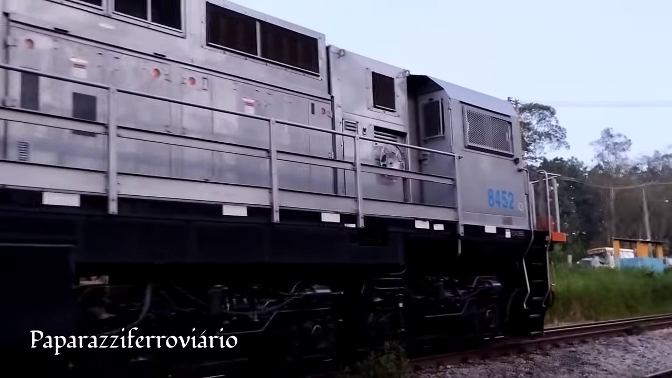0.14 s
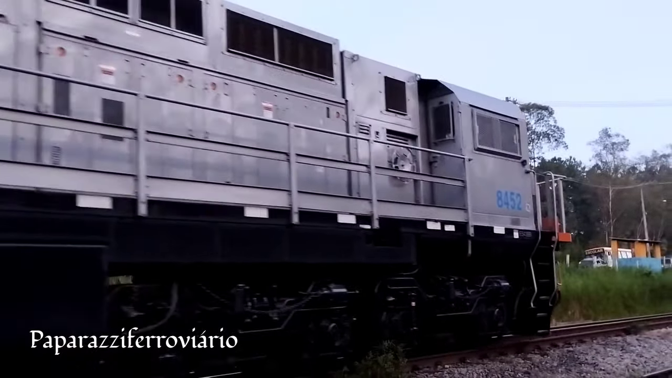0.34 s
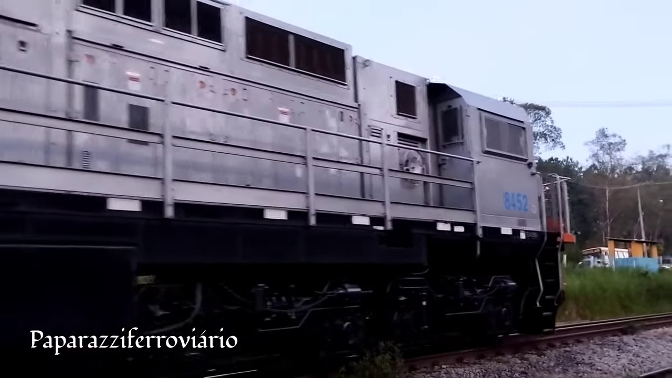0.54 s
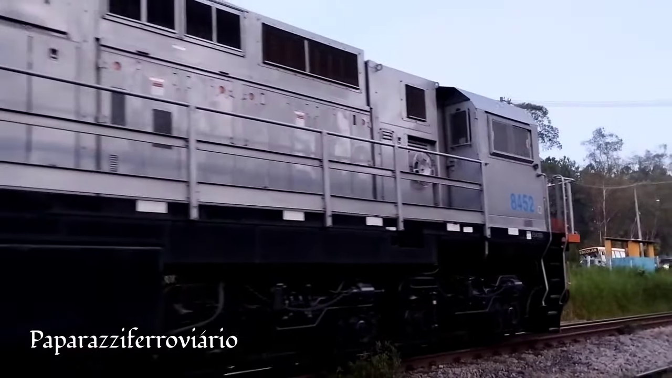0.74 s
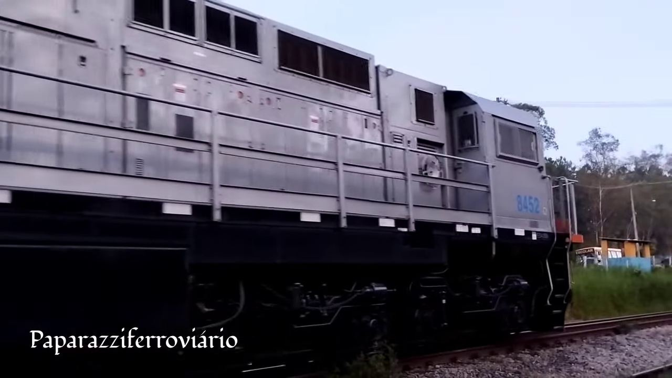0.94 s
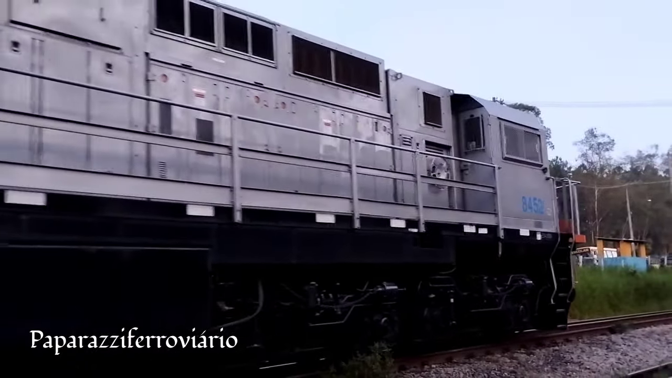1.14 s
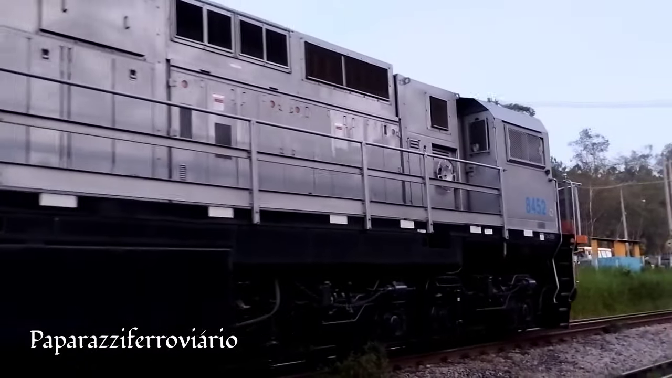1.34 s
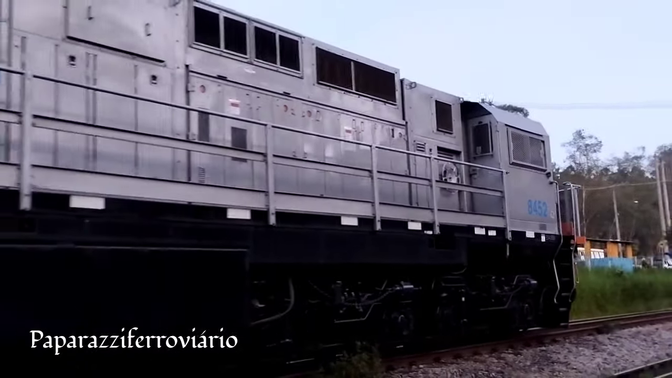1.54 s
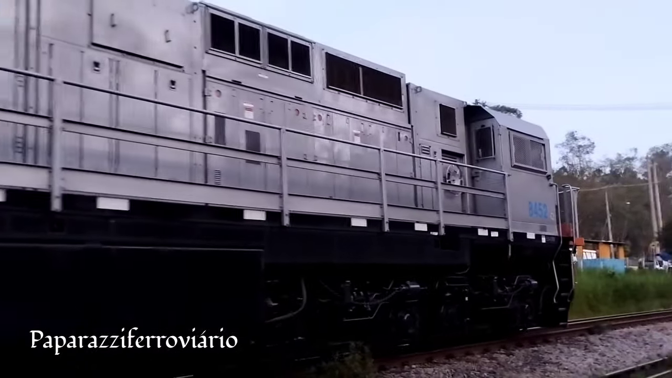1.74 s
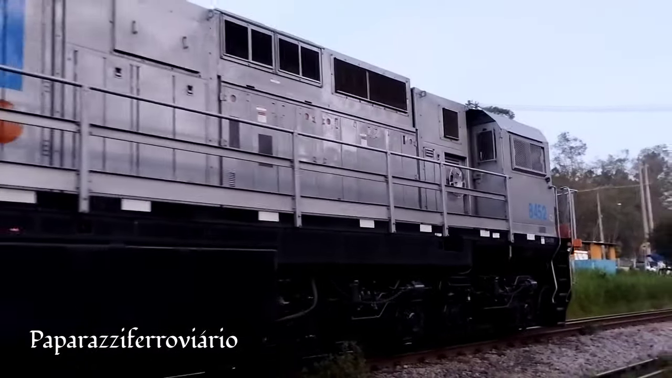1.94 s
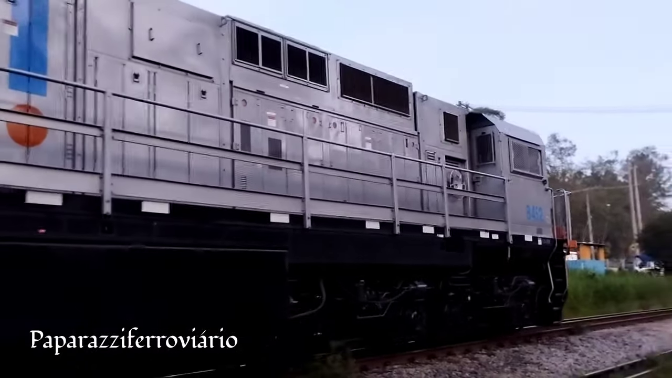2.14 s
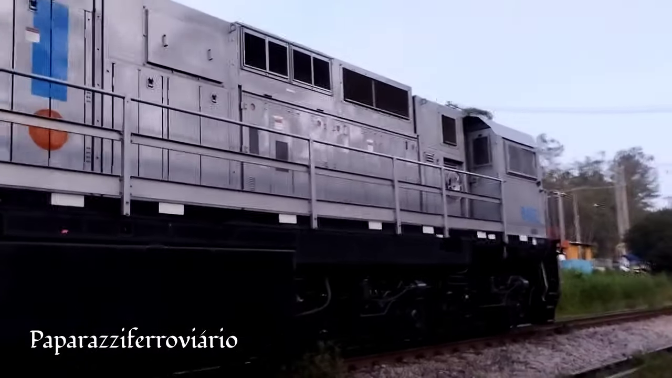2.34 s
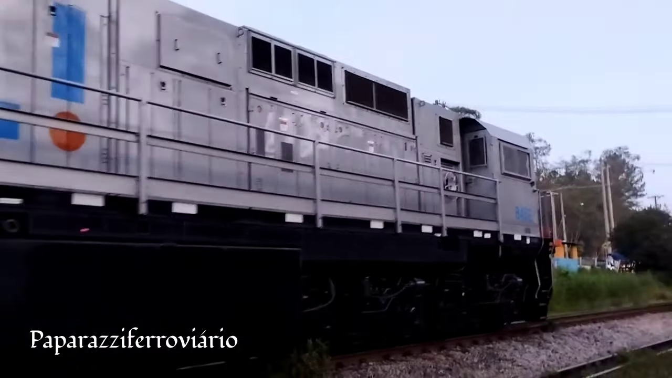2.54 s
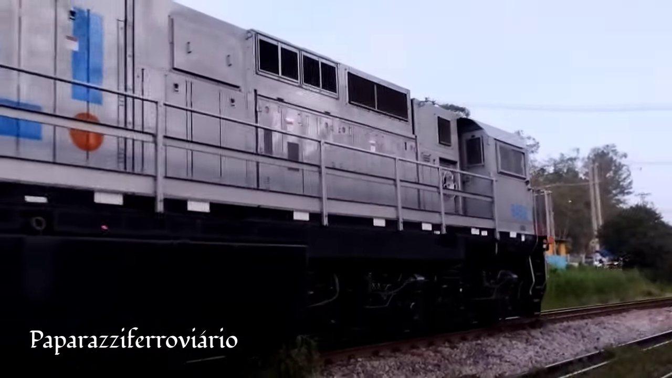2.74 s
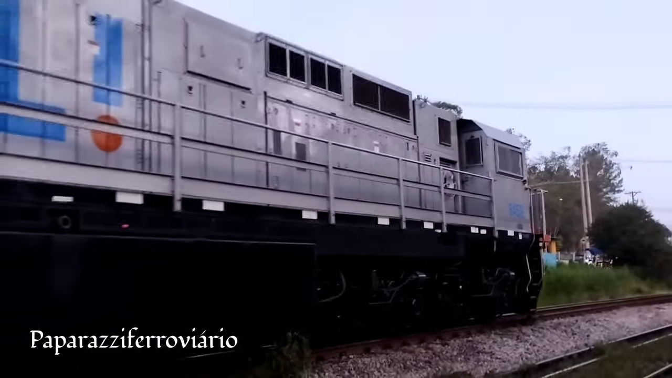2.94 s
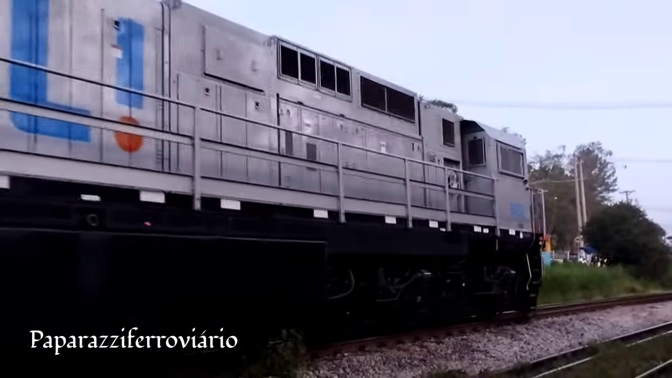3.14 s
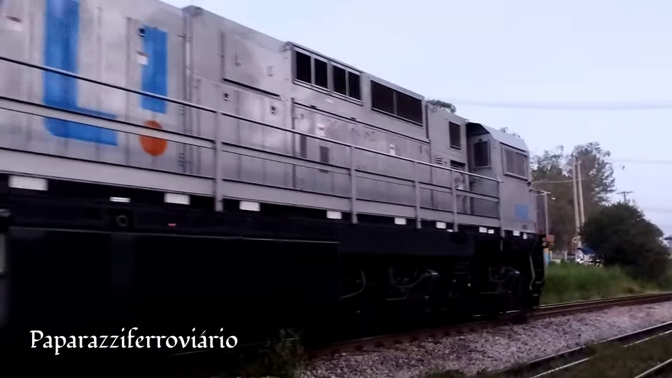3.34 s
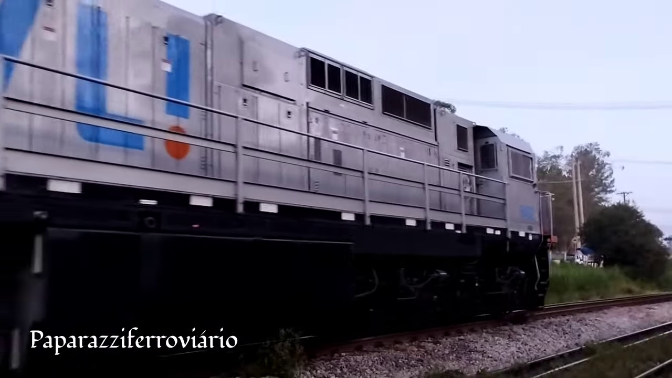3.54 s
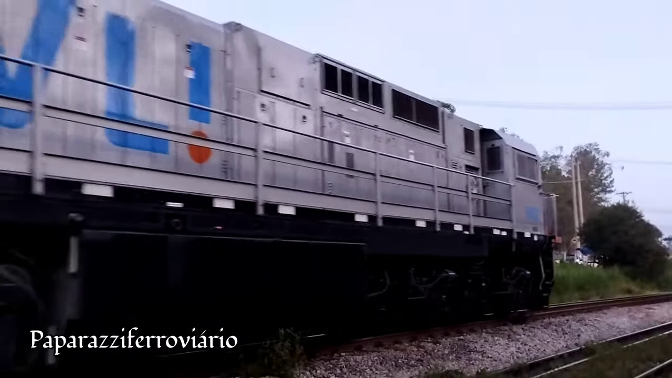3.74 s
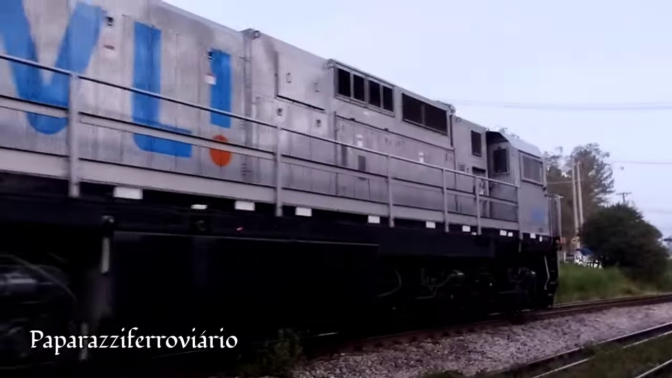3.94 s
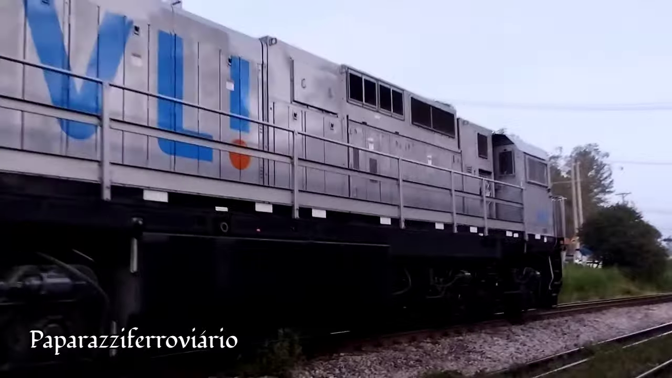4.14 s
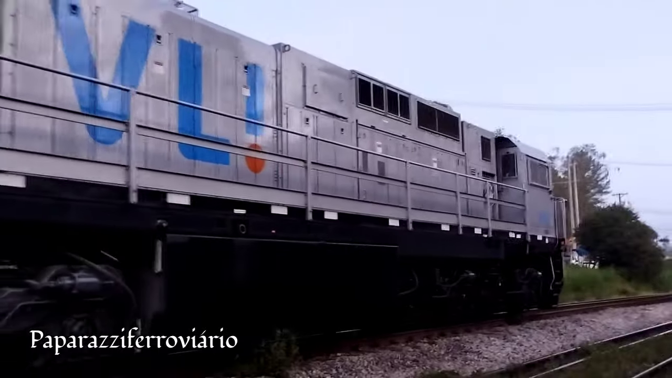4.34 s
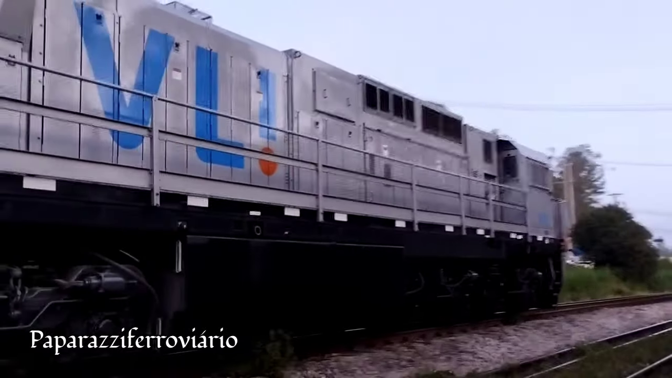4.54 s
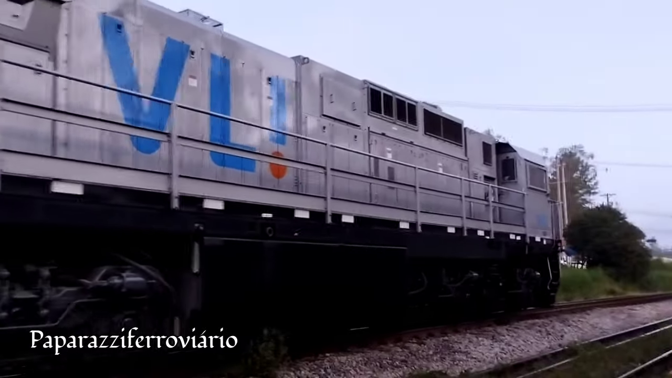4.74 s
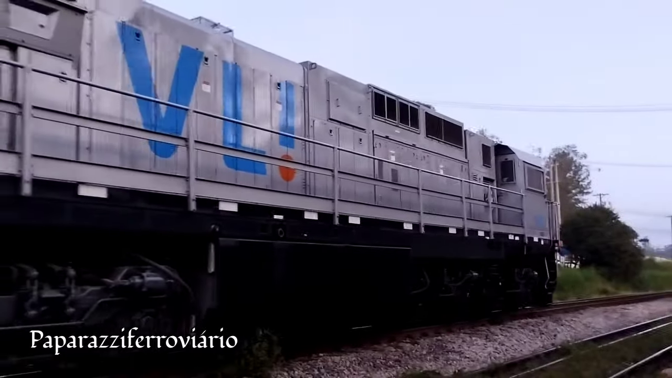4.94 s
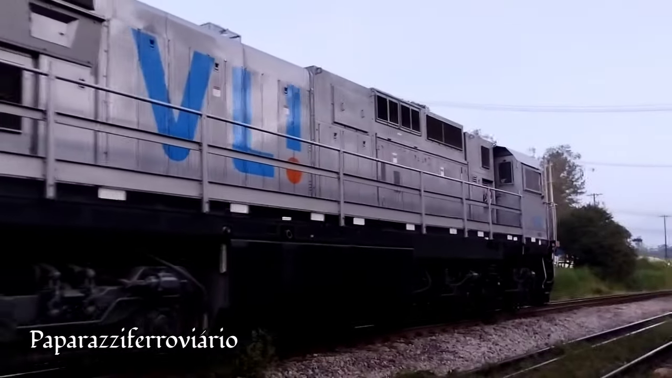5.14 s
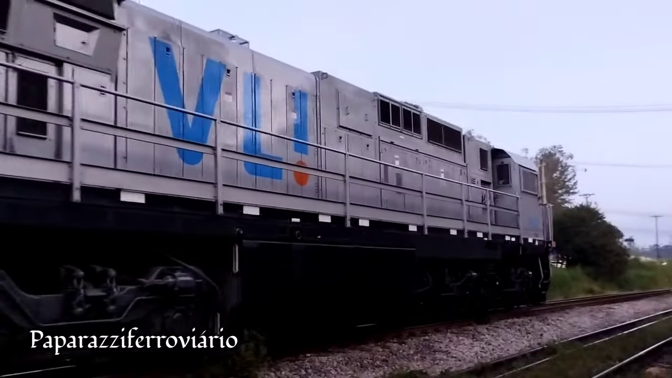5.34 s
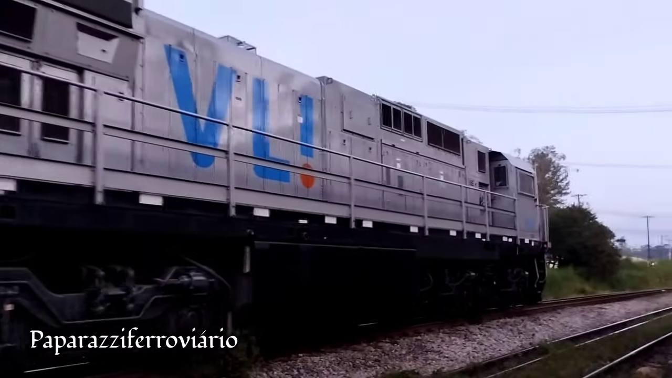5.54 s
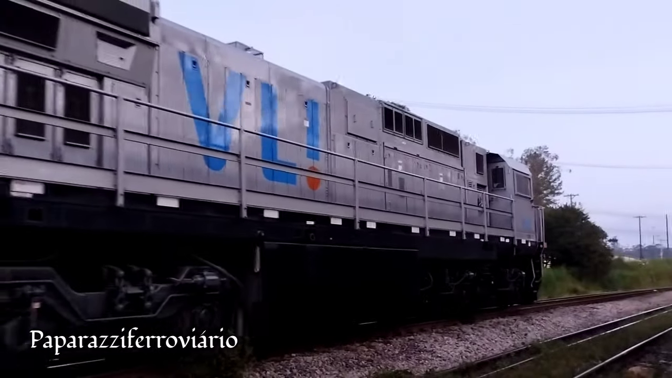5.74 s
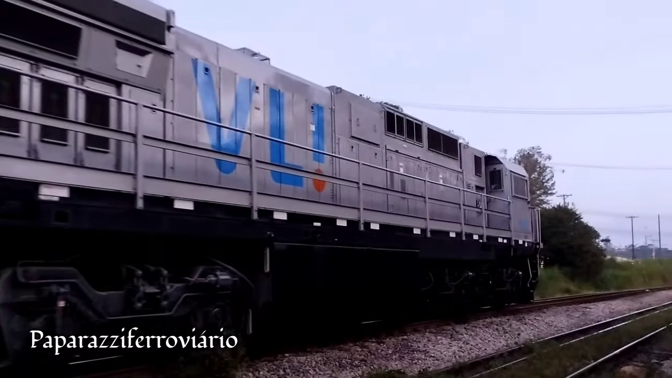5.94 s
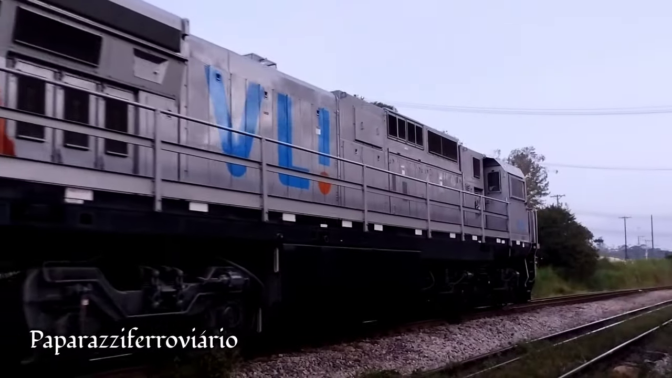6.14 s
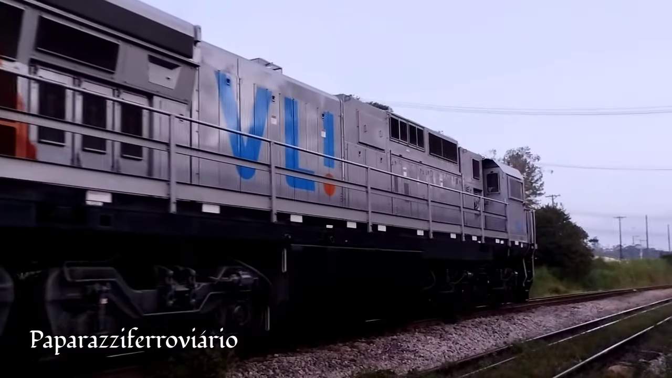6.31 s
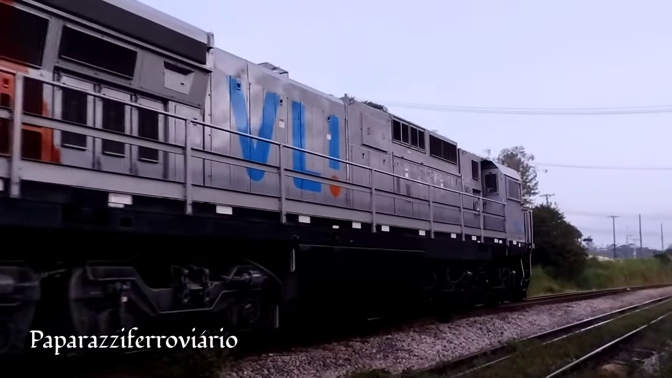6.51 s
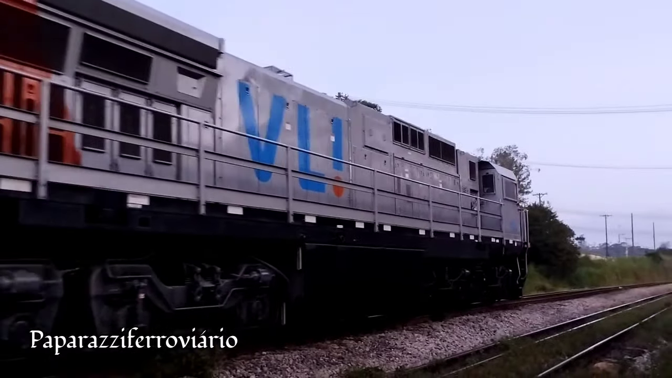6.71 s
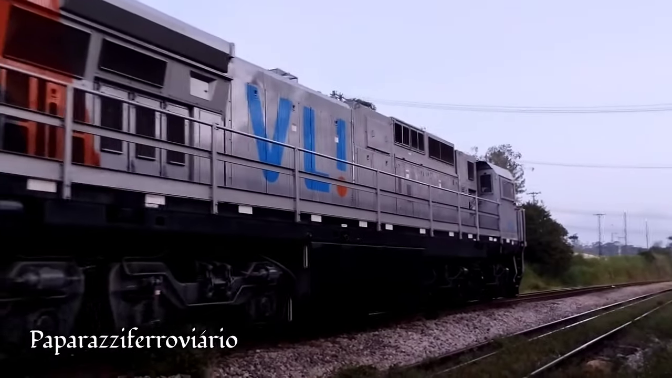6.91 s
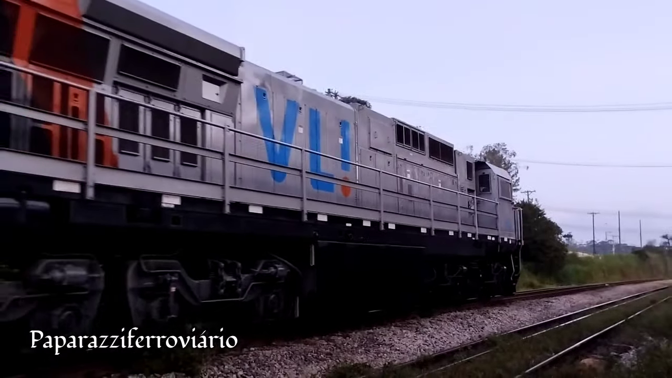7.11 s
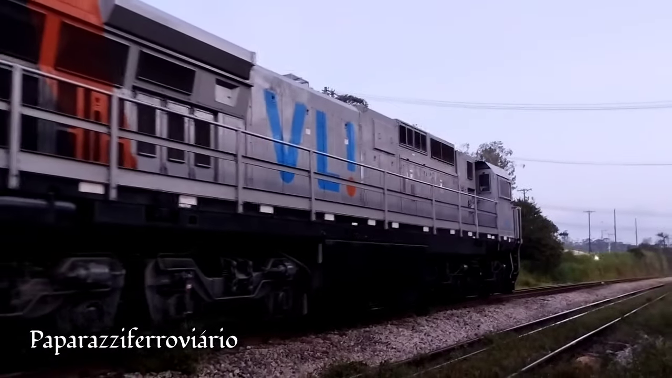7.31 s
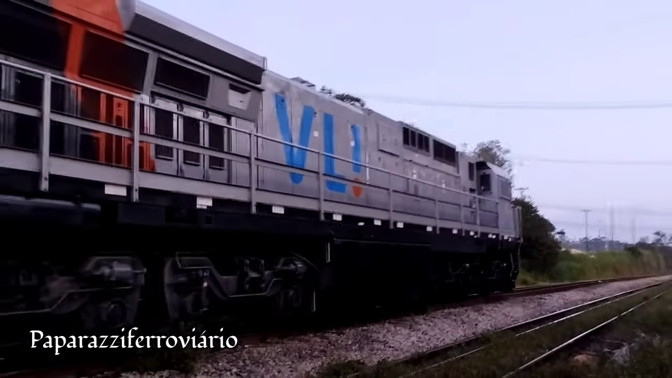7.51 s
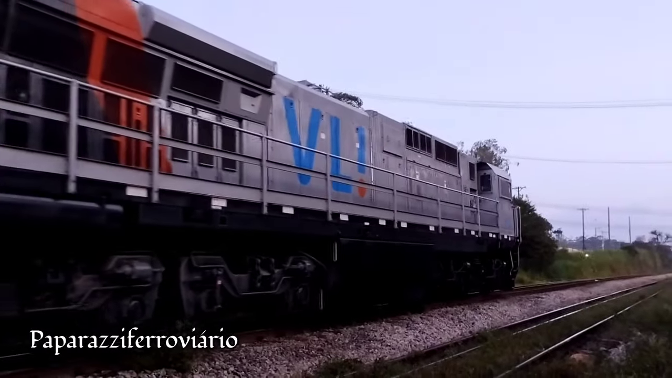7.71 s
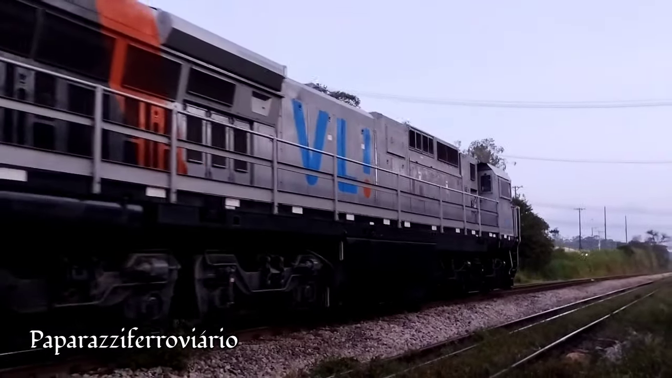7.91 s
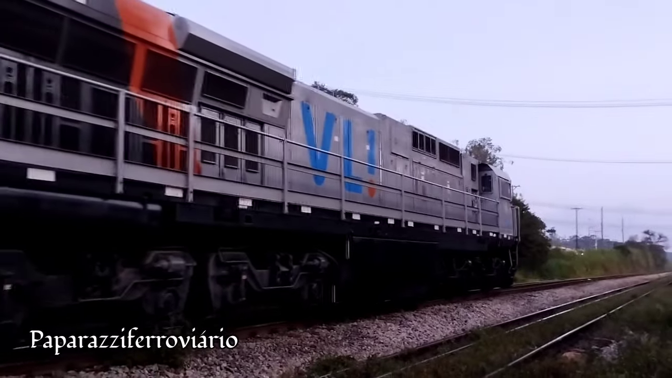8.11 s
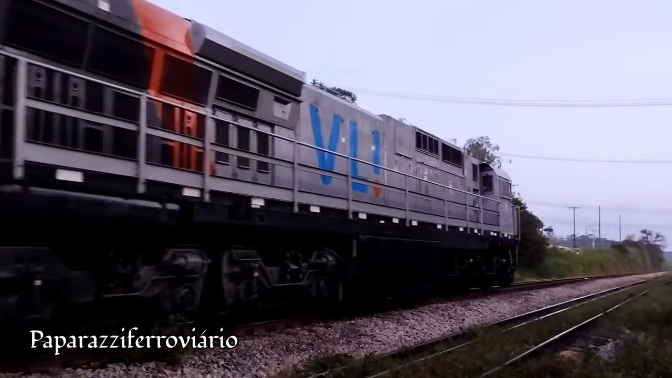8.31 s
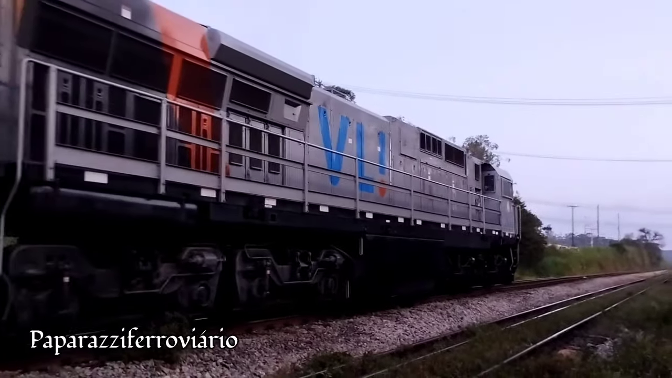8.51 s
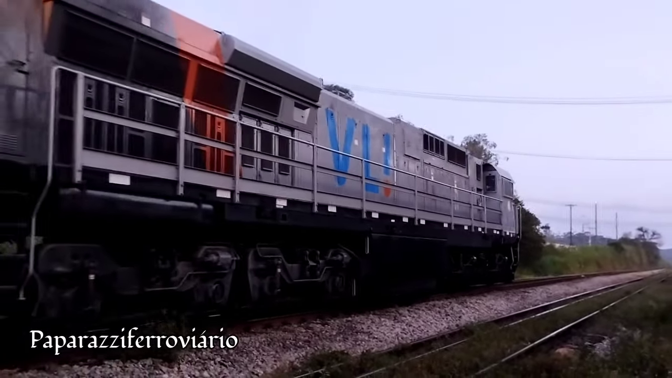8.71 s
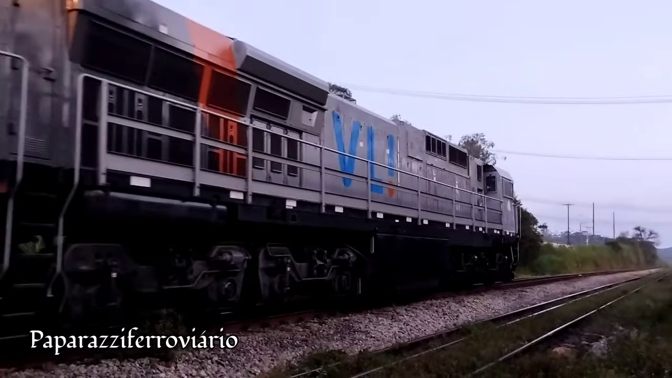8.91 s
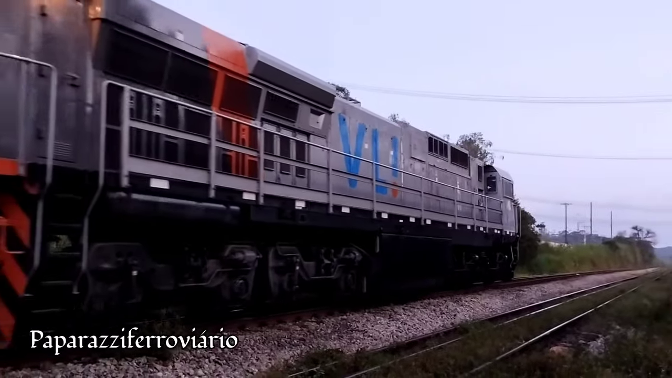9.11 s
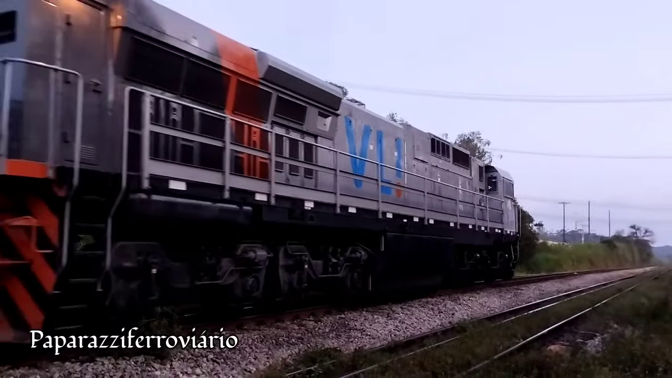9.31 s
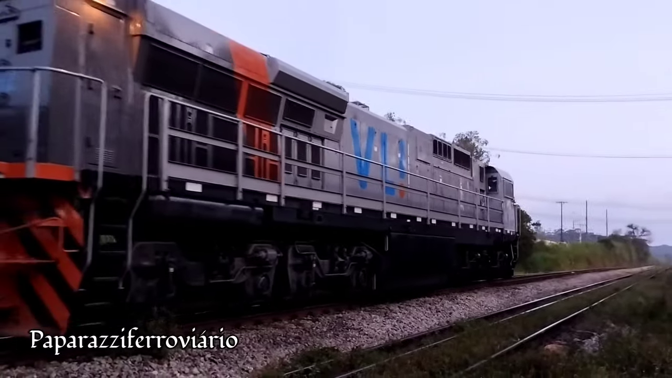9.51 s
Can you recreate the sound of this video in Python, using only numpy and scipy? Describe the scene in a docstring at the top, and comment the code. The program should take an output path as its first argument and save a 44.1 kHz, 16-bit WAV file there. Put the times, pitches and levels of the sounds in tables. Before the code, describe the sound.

A diesel freight locomotive crawls past a few metres from an outdoor trackside stereo microphone. Its exhaust drones and throbs at a nearly steady idle-like pace, with rough barks, humming drives and broad rushing air. A fluttering turbo whistle climbs and swells repeatedly. Valve gear clatters as it comes abreast, then the hood rings hollowly. The bark dulls and the drone sinks, before faint wheel ringing and fresh air rush from a following locomotive.

```python
"""Trackside, two-port microphone: a diesel freight locomotive rolls past a few metres off, engine nearly steady.
From the start the exhaust lines drone and throb once per engine cycle, firings bark as cracks and gas noise,
geared drives hum and banded noise gives the blowers' rush; a fluttering turbo tone soon climbs and swells.
Valve gear clatters abreast at about 2.4 s, then the hood rings; as the stack draws off its bark softens and dulls.
Towards the end the rear bogie's ringing comes abreast and the next locomotive's nose adds rushing air."""
import sys
import numpy as np
from scipy.fft import rfft, irfft, next_fast_len
from scipy.io import wavfile
from scipy.ndimage import map_coordinates

SR = 44100
rng = np.random.default_rng(int(sys.argv[2]) if len(sys.argv) > 2 else 0)


def put_to_file(sound):
    """Save the sound as 16-bit audio at rate SR, in the file named by the first command-line argument."""
    columns = np.atleast_2d(sound).T  # one column per channel
    safe = np.clip(columns, -1, 1)
    whole_steps = np.round(safe * 32767)
    wavfile.write(sys.argv[1], SR, whole_steps.astype(np.int16))


N = 426006


def amp(db):
    """Decibels to amplitude."""
    return np.exp(np.asarray(db) * (np.log(10) / 20))


def unit(x):
    """Scale to an rms of 1."""
    return x / np.sqrt(np.mean(x ** 2) + 1e-20)


def along(hz, f, v):
    """Values v at frequencies f, read on a log axis."""
    return np.interp(np.log(hz + 1), np.log(np.asarray(f) + 1), v)


def curves(rows):
    """One value per sample for each column after the time."""
    time_s, *columns = np.transpose(rows)
    return [np.interp(np.arange(N) / SR, time_s, column) for column in columns]


def wobble(rate):
    """A smooth random curve, rate knots a second."""
    coarse = np.linspace(0, N, int(8 * N * rate / SR) + 2)
    knots = rng.standard_normal(int(N * rate / SR) + 4)
    smooth = map_coordinates(knots, [coarse * rate / SR])
    return np.interp(np.arange(N), coarse, smooth)


def filtered(x, response):
    """x times a response of frequency."""
    m = next_fast_len(N + 8192, real=True)
    hz = np.fft.rfftfreq(m, 1 / SR)
    return irfft(rfft(x, m) * response(hz), m)[..., :N]


def band(hz, centre_hz, half_width_hz):
    """Gain of one resonance, with steep skirts."""
    return 1 / (1 + ((hz - centre_hz) / half_width_hz) ** 2)


# left port against right: pitch_hz, left_minus_right_db
PORT_TILT = [(110, -4.9), (200, -3), (400, 2.5), (580, -1.5), (780, 0.5), (1200, -1.5), (2200, -4),
             (3500, -1.5), (5500, -5.5), (8000, -3), (11000, 0.5)]
# left port ahead of right: pitch_hz, lead_rad
PORT_LEAD = [(0, 0), (300, .6), (860, 1.4), (1640, 3.9), (2500, 7.6), (5600, 18.8), (13700, 46.8)]


def port_gains(hz):
    """Level and phase of a direct sound at the left and right microphone port."""
    level_ratio = amp(along(hz, *np.transpose(PORT_TILT)) / 2)
    half = level_ratio * np.exp(.5j * np.interp(hz, *np.transpose(PORT_LEAD)))
    return np.array([half, 1 / half])


# share of power alike at both microphone ports: pitch_hz, likeness (held to 0-1 when used)
PORT_LIKENESS = [(100, 12), (300, 2.3), (550, 0.77), (1000, 0.76), (2000, 0.42), (4000, 0.59), (12000, 0)]


def radiate(direct, gate, spectrum, away):
    """A direct sound plus its scatter off ballast and steel, blended from near to far colour, each of rms 1."""
    m = next_fast_len(N + 8192, real=True)
    hz = np.fft.rfftfreq(m, 1 / SR)
    alike = np.clip(along(hz, *np.transpose(PORT_LIKENESS)), 0, 1)
    scatter = rfft(rng.standard_normal((2, N)) * gate, m)
    source = rfft(unit(direct * gate), m)
    pair = (np.sqrt(alike) * source + np.sqrt(1 - alike) * scatter) * port_gains(hz)
    f, near_db, far_db = np.transpose(spectrum)
    inside = (hz > f[0]) & (hz < f[-1])

    def coloured(db):
        return unit(irfft(pair * inside * amp(along(hz, f, db)), m)[:, :N])

    near, far = coloured(near_db), coloured(far_db)
    away = np.clip(away, 0, 1)
    return (1 - away) * near + away * far


SPEED_M_PER_S = 1.8


def passing(level_db, abreast_s, distance_m):
    """Level in dB of a part that rolls by on a straight line, falling with its range."""
    travelled_m = SPEED_M_PER_S * (np.arange(N) / SR - abreast_s)
    return level_db - 10 * np.log10(1 + (travelled_m / distance_m) ** 2)


def lobes(crest_s, period_s, depth_db):
    """Rise and fall in dB as the lobes of a source sweep over the microphone."""
    return depth_db * np.cos(2 * np.pi * (np.arange(N) / SR - crest_s) / period_s)


# each part's pass by the microphone: level_db when abreast, abreast_s, distance_m
PART_PASSES = {"rumble": (-24, -.2, 5.8), "growl": (-19, 0.86, 3.49), "clatter": (-32.5, 2.4, 6),
               "hood": (-37, 3.4, 1.24), "whine": (-46, 4.2, 2.2), "blower": (-26.5, 0.12, 2.38),
               "hiss": (-28, 1, 2.91), "fizz": (-33.5, 0.87, 1.82), "rear bogie": (-39.5, 9.34, 3.3),
               "front whine": (-41.5, 1.86, 1.3), "fan hum": (-52, 7.4, 4),
               "blower whine": (-43.5, 0.61, 2.3)}
# radiation lobes sweeping by: crest_s, period_s, depth_db
PART_LOBES = {"rumble": (3.7, 6.4, 0.67), "growl": (2.5, 1.99, 1), "clatter": (0.65, 5.34, 2.3),
              "blower": (1.3, 4.5, 1), "hiss": (5.03, 6, 0.88), "fizz": (4.9, 5.2, 1),
              "whine": (4.74, 1.8, 2.5)}
# air rush from the following locomotive's nose: level_db when abreast, abreast_s, distance_m
FOLLOWING_NOSE = {"blower": (-38, 11, 0.28), "hiss": (-44.5, 9.7, 0.38), "fizz": (-52, 9.85, 0.31)}


def level(part):
    """Level in dB of one part: its pass, its lobes, and its like on the following locomotive."""
    db = passing(*PART_PASSES[part])
    if part in PART_LOBES:
        db = db + lobes(*PART_LOBES[part])
    if part in FOLLOWING_NOSE:
        nose_db = passing(*FOLLOWING_NOSE[part])
        db = 20 * np.log10(np.hypot(amp(db), amp(nose_db)))
    return db


# engine cycle of two crank turns: time_s, rate_hz
ENGINE_CYCLE = [(0, 7.404), (1, 7.402), (3.1, 7.39), (5.7, 7.385), (8.3, 7.364), (9.66, 7.36)]


def repeating(cycle, share):
    """Noise of which a share of the power comes back alike in every engine cycle."""
    size = round(SR / ENGINE_CYCLE[0][1])
    pattern = rng.standard_normal(size)[(cycle % 1 * size).astype(int)]
    share = np.clip(share, 0, 1)
    return np.sqrt(share) * pattern + np.sqrt(1 - share) * rng.standard_normal(N)


def stroke(cycle, at, width):
    """A smooth bump at one place of the engine cycle; both in cycles."""
    distance = (cycle - at + .5) % 1 - .5
    return np.exp(-.5 * (distance / width) ** 2)


# twelve unevenly firing cylinders: place in the cycle (0-1), thump_db (low), bark_db (sharp)
CYLINDER_FIRINGS = [(.046, -12, -9), (.106, -4, -7), (.189, -10, -13), (.284, -8, -6), (.372, -2, -10),
                    (.433, -10, -12), (.53, -12, -12), (.628, 0, -9), (.716, -9, -11), (.78, -10, -8),
                    (.833, -11, -12), (.969, -1, 0)]
# engine alongside, drawing away, far: time_s of each
STAGE_TIMES = [1.5, 4.2, 7.2]


def engine_lines(cycle, rows, firing_db, resonances, waver_db, drift):
    """Wavering multiples of the engine cycle, phased by the firings and the lag of their resonances; rms 1."""
    t = np.arange(N) / SR
    places = np.transpose(CYLINDER_FIRINGS)[0]
    lines, power = np.zeros(N), np.zeros(N)
    for order, *stage_db in rows:
        size = amp(np.interp(t, STAGE_TIMES, stage_db) + waver_db * wobble(1.49))
        push = np.sum(amp(firing_db) * np.exp(-2j * np.pi * order * places))
        line_hz = order * ENGINE_CYCLE[0][1]
        lag = sum(np.arctan((line_hz - hz) / width) for hz, width in resonances)
        phase = 2 * np.pi * order * cycle + np.angle(push) - lag + drift * wobble(1.2)
        lines += size * np.cos(phase)
        power += size ** 2 / 2
    return lines / np.sqrt(power)


# the stack's two strongest registers swell and cancel as it moves: time_s, boom_db, drone_db
EXHAUST_COURSE = [(0.0, -12.5, -11.5), (0.9, -8.5, -11.5), (1.45, -11.5, -9), (2.1, -34, -11),
                  (2.5, -28, -13), (3.05, -20, -13), (3.5, -14.5, -13), (4.1, -12, -13.5),
                  (4.9, -18, -19.5), (7.3, -23.5, -24.5), (8.3, -28, -28), (9.66, -22.5, -25.5)]
# borders of the rumble, boom, drone and growl: pitch_hz
REGISTER_BORDERS = [40, 100, 115, 180, 275]
# exhaust lines, relative within a register: multiple of the cycle, alongside_db, drawing_away_db, far_db
EXHAUST_LINES = [(6, -41, -47, -47), (8, -54, -49, -52), (9, -44, -41, -41), (10, -42, -39, -42),
                 (11, -36, -38, -40), (12, -27, -30, -37), (13, -29, -33, -42), (14, -33, -44, -43),
                 (15, -13, -15, -24), (16, -20, -25, -29.5), (17, -26, -34, -43), (18, -23, -28, -36),
                 (19, -23, -28, -38), (20, -16, -20, -36), (21, -17, -20, -31), (22, -20, -23, -34),
                 (23, -31, -34, -44), (24, -37, -40, -53), (25, -32, -36, -42), (26, -36, -40, -47),
                 (27, -27, -30, -40), (28, -23, -28, -34), (29, -33, -38, -43), (30, -32, -40, -43),
                 (31, -36, -45, -49), (32, -36, -45, -47), (33, -44, -43, -47), (34, -38, -39, -51),
                 (35, -45, -42, -55), (36, -39, -50, -46)]
# low resonances of manifold and silencer that delay the lines' phase: pitch_hz, half_width_hz
SILENCER_RESONANCES = [(129, 15), (173, 4), (200, 15)]


def exhaust(cycle, turbulence_db):
    """The stack's low lines beat into a throb, over a little gas turbulence."""
    out = np.zeros(N)
    thump_db = np.transpose(CYLINDER_FIRINGS)[1]
    registers_db = [level("rumble"), *curves(EXHAUST_COURSE), level("growl")]
    borders = zip(REGISTER_BORDERS, REGISTER_BORDERS[1:])
    for (lo, hi), level_db, rough_db in zip(borders, registers_db, turbulence_db):
        rows = [row for row in EXHAUST_LINES if lo < row[0] * ENGINE_CYCLE[0][1] < hi]
        lines = engine_lines(cycle, rows, thump_db, SILENCER_RESONANCES, waver_db=.8, drift=.08)
        gas = filtered(rng.standard_normal(N), lambda hz: 1 / (1 + (lo / (hz + 1)) ** 6 + (hz / hi) ** 12))
        out += amp(level_db) * (lines + amp(rough_db) * unit(gas))
    # long waves reach both ports alike, the left one 0.36 ms earlier
    return filtered(out, lambda hz: np.exp(1j * np.pi * hz * .00036 * np.array([[1], [-1]])))


# the bark drops and dulls quickly as the stack moves off: time_s, level_db, away (0 alongside, 1 far)
BARK_FADE = [(0, -27.5, 0), (1, -25, 0.061), (2, -24, 0), (2.6, -29.5, 1), (3.5, -30.5, 0.99),
             (4.5, -30.5, 0.6), (5.8, -29.5, 0.66), (7.3, -32.5, 0.91), (8.2, -34, 1), (9.66, -36, 0.92)]
# colour of the bark's gas: pitch_hz, alongside_db, far_db
BARK_SPECTRUM = [(255, -40, -36), (290, -42, -3), (346, -1, -1), (370, -4.5, -6), (394, -1, -2),
                 (445, -1, -7.5), (481, -1, -6.5), (542, 7.5, -3), (543, -2.5, -4.5), (592, 1.5, -5.5),
                 (669, -12, -7.5), (703, -26, -14), (800, -40, -40)]
# strongest lines of the silencer's bark, relative: multiple of the cycle, alongside_db, drawing_away_db, far_db
SILENCER_LINES = [(37, -47, -51, -49), (42, -52, -48, -51), (43, -47, -46, -51), (44, -47, -41.5, -41.5),
                  (45, -46, -53, -57), (46, -47, -49, -43), (47, -46, -53, -47), (48, -45, -50, -57),
                  (51, -46, -54, -57), (52, -45, -52, -58), (53, -36.5, -44, -47.5), (55, -46, -46, -56),
                  (56, -41, -46, -49), (58, -49, -50, -57), (59, -41, -48, -49), (60, -43, -52, -58),
                  (61, -50, -50, -56), (63, -44, -55, -53), (65, -45, -53, -57), (66, -46, -52, -52),
                  (67, -45, -52, -55), (68, -39, -45, -47), (69, -41, -53, -55), (70, -40, -47, -49),
                  (71, -34.5, -42, -43), (72, -43, -48, -53), (73, -46, -55, -52), (77, -44, -54, -58),
                  (78, -41, -49, -52), (80, -40, -49, -52), (81, -47, -58, -60), (82, -48, -55, -57),
                  (83, -49, -56, -56)]


def bark(cycle, depth, lines_db, puffs_db, crack_db):
    """Every firing throws a crack and a puff of gas through the ringing silencer; one cylinder barks hardest."""
    level_db, away = curves(BARK_FADE)
    places, _, firing_db = np.transpose(CYLINDER_FIRINGS)
    cracks, puffs = np.zeros(N), np.zeros(N)
    for place, size in zip(places, amp(firing_db)):
        cracks[1:] += size * np.diff(np.floor(cycle - place))  # one click as the cycle reaches the firing
        puffs += size * stroke(cycle, place, .012)
    cracks = unit(cracks * amp(1.5 * wobble(40)))
    gate = unit(1 + depth * puffs)
    source = amp(crack_db) * cracks + repeating(cycle, share=0.13)
    gas = radiate(source, gate, BARK_SPECTRUM, away)
    lines = engine_lines(cycle, SILENCER_LINES, firing_db, [], waver_db=2.0, drift=.35)
    ring = filtered(lines, port_gains)
    return amp(level_db) * (amp(puffs_db) * gas + amp(lines_db) * ring)


# hum of the geared auxiliaries: multiple of the cycle, alongside_db, drawing_away_db, far_db
DRIVE_HUMS = [(24.5, -39, -43, -54), (30.75, -35, -39, -44), (42.2, -52, -51, -46), (53.5, -56, -54, -47)]


def drives(cycle):
    """Geared auxiliaries hum between the engine's own lines and beat against them."""
    t, hum = np.arange(N) / SR, np.zeros(N)
    for ratio, *stage_db in DRIVE_HUMS:
        size = amp(np.interp(t, STAGE_TIMES, stage_db) + 1.5 * wobble(1.2))
        hum += size * np.sin(2 * np.pi * ratio * cycle + .4 * wobble(1.2))
    return np.sqrt(2) * filtered(hum, port_gains)


# colour of the air in ducts and grilles, low to high: pitch_hz, alongside_db, far_db
BLOWER_SPECTRUM = [(1188, -40, -40), (1395, -23, 15.5), (1425, 4, -11), (1555, 6.5, 7.5), (1600, 1.5, 3),
                   (1810, 3.5, 4), (1890, 8.5, -2), (2090, 1, 3), (2450, -4.5, 4), (2750, 0.5, 6.5),
                   (2970, -8.5, 0), (3170, -1, 6), (3560, -44, -40)]
HISS_SPECTRUM = [(2830, -42, -40), (3240, -3, 3), (3700, -5.5, 2.5), (4330, -5, 5), (4600, -5, 6.5),
                 (4980, 4, 5.5), (5100, -3.5, 3.5), (5430, -1, 4), (5800, -1, 0), (6500, 2, 0),
                 (6880, -4, -0.5), (7300, -2, -5.5), (8240, -7.5, -2.5), (9500, -42, -40)]
FIZZ_SPECTRUM = [(7440, -40, -40), (8280, 1, 1.5), (9500, -0.5, 2), (10300, -3.5, 0), (12200, -4, -4),
                 (13000, -6.5, -4), (13800, -19, -3), (15456, -40, -40)]


def blowers(cycle, away, blower_db, hiss_db, fizz_db, chuff):
    """Air rushes through ducts and grilles, and chuffs lightly with the engine cycle."""
    chuffs = stroke(cycle, 0.51, 0.059) + 0.29 * stroke(cycle, 0.21, 0.078)
    gate = unit(1 + chuff * chuffs)
    rasp_db = 1.1 * wobble(70)
    rush_level = amp(blower_db + 0.48 * wobble(9) + rasp_db)
    rush = rush_level * radiate(repeating(cycle, 0.14), gate, BLOWER_SPECTRUM, away)
    hiss = amp(hiss_db + 0.35 * wobble(15)) * radiate(rng.standard_normal(N), gate, HISS_SPECTRUM, away)
    fizz = amp(fizz_db + 0.92 * wobble(13)) * radiate(rng.standard_normal(N), gate, FIZZ_SPECTRUM, away)
    return rush + hiss + fizz


# blade tones of blowers and fans: part, pitch_hz, half_width_hz
BLADE_TONES = [("front whine", 1970, 11), ("whine", 2166, 25), ("fan hum", 880, 3),
               ("blower whine", 2000, 6)]


def whine(part, pitch_hz, half_width_hz):
    """A blower or fan's blade tone, blurred by turbulent air into a narrow band of noise."""
    noise = rng.standard_normal((2, N))
    tone = filtered(noise, lambda hz: band(hz, pitch_hz, half_width_hz) * port_gains(hz))
    return amp(level(part) + 0.46 * wobble(6.5)) * unit(tone)


# turbocharger spooling up: time_s, pitch_hz (centre of the fluttering blade tone)
TURBO_PITCH = [(0.0, 2425), (1.2, 2499), (1.55, 2517), (3.75, 2609), (4.9, 2646), (5.45, 2662), (5.8, 2666),
               (9.66, 2669)]
# its whistle comes and goes in swells about two seconds apart: time_s, level_db
TURBO_SWELLS = [(0, -56), (.7, -44), (.9, -53), (1.05, -43), (1.3, -35.5), (1.7, -41), (2.0, -44),
                (2.35, -46), (3.0, -54), (3.35, -41.5), (3.72, -36), (4.0, -47.5), (4.35, -40.5),
                (4.72, -52), (4.88, -44), (5.08, -58), (5.35, -39.5), (5.8, -35), (6.3, -46), (6.65, -53),
                (7.3, -41.5), (7.65, -38.5), (8.1, -44.5), (8.8, -56), (9.2, -65)]


def turbo(flicker_db, haze_db):
    """The blade tone climbs as the turbocharger spools up; hot gas makes it flutter and spreads a haze round it."""
    pitch_hz = curves(TURBO_PITCH)[0] + 3.5 * wobble(90)
    phase = 2 * np.pi * np.cumsum(pitch_hz) / SR
    haze = np.array([wobble(130) * np.cos(phase) + wobble(130) * np.sin(phase) for port in "LR"])
    tone = unit(np.sin(phase) * amp(flicker_db * wobble(45)) + amp(haze_db) * haze)
    port_balance = amp([[-1], [1]])  # 1 dB down at left, 1 dB up at right
    return amp(curves(TURBO_SWELLS)[0]) * port_balance * filtered(tone, port_gains)


# colour of the valve gear: pitch_hz, alongside_db, far_db
CLATTER_SPECTRUM = [(593, -41, -38), (668, 2.5, -19), (726, -2, -0.5), (807, 7.5, 0), (900, 8, -2.5),
                    (1010, 4, 0.5), (1184, 1.5, 4), (1290, -8, -3), (1355, 7.5, -15), (1570, -40, -43)]


def clatter(cycle, away, level_db, knock):
    """Valve gear and injectors rattle behind the hood doors, with one harder knock a cycle."""
    knocks = stroke(cycle, .52, .03) + .5 * stroke(cycle, .15, .025) + .45 * stroke(cycle, .86, .02)
    gate = unit(1 + knock * knocks)
    uneven_db = .4 * wobble(12)
    return amp(level_db + uneven_db) * radiate(repeating(cycle, 0.13), gate, CLATTER_SPECTRUM, away)


def hood(cycle, pitch_hz, half_width_hz):
    """The engine's vibration rings the hood in one hollow resonance."""
    vibration = repeating(cycle, share=0.14)
    ring = filtered(vibration, lambda hz: band(hz, pitch_hz, half_width_hz) * port_gains(hz))
    return amp(level("hood")) * unit(ring)


# ringing of wheel and rail: pitch_hz, half_width_hz, level_db (relative)
WHEEL_RINGING = [(1056, 134, 8.5), (1336, 59, 6), (1500, 75, 1.5), (1890, 100, -4), (3020, 440, 2.5),
                 (4250, 500, -29)]


def wheels(swell_db, grit_db):
    """Rough treads ring wheel and rail in uneven swells, with quick gritty flecks."""
    def ringing(hz):
        return sum(amp(db) * band(hz, centre, width) for centre, width, db in WHEEL_RINGING)

    tread = rng.standard_normal((2, N)) * amp(grit_db * wobble(70))
    return amp(level("rear bogie") + swell_db * wobble(11)) * unit(filtered(tread, ringing))


# how far the engine's colour has moved off: time_s, away (0 alongside, 1 far)
DRAWING_AWAY = [(2.1, 0.041), (4.2, 0.63), (6.5, 0.78), (9.66, 0.63)]


def scene():
    """All parts of the locomotive, tied to one engine cycle and one rolling speed."""
    cycle = np.cumsum(curves(ENGINE_CYCLE)[0]) / SR  # cycles elapsed
    away, = curves(DRAWING_AWAY)
    return (exhaust(cycle, turbulence_db=[-13.5, -29, -13.5, -10.5])
            + bark(cycle, depth=0.21, lines_db=-2.5, puffs_db=-3.5, crack_db=-16.0)
            + drives(cycle)
            + blowers(cycle, away, level("blower"), level("hiss"), level("fizz"), chuff=0.29)
            + sum(whine(*row) for row in BLADE_TONES)
            + turbo(flicker_db=2.0, haze_db=-10)
            + clatter(cycle, away, level("clatter"), knock=0.52)
            + hood(cycle, pitch_hz=855, half_width_hz=50)
            + wheels(swell_db=0.5, grit_db=2.2))


TOP_HZ = 14200


def record(dry):
    """The microphone chain rounds off peaks at full scale and keeps nothing above its band limit."""
    rounded = dry / (1 + np.abs(dry) ** 12) ** (1 / 12)
    return filtered(rounded, lambda hz: hz < TOP_HZ)


dry = scene()
out = record(dry)
put_to_file(out)
```